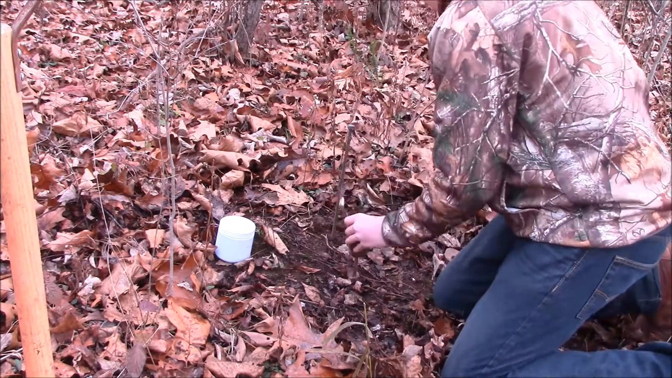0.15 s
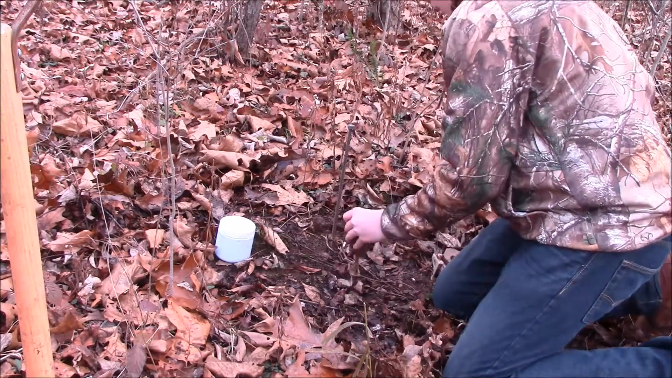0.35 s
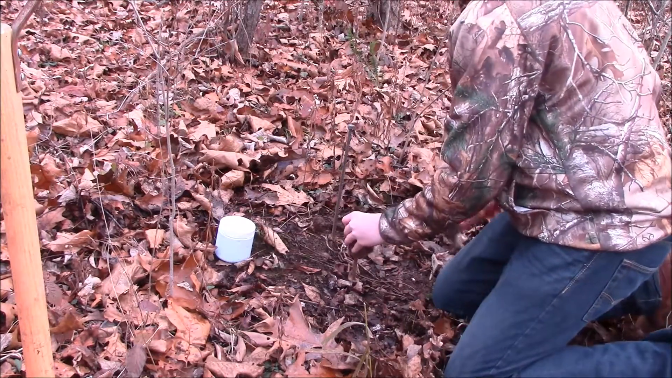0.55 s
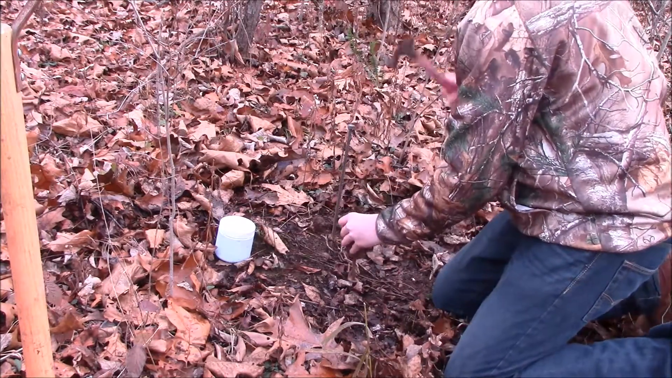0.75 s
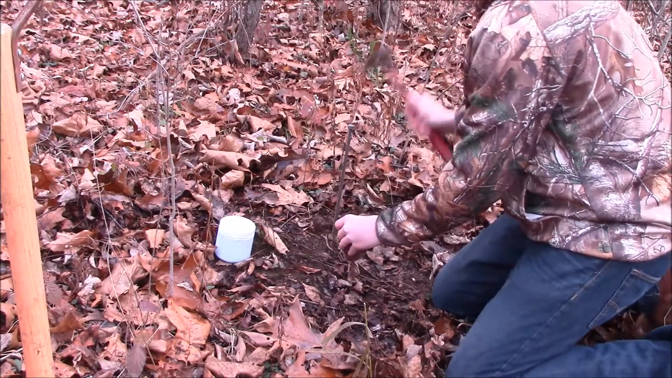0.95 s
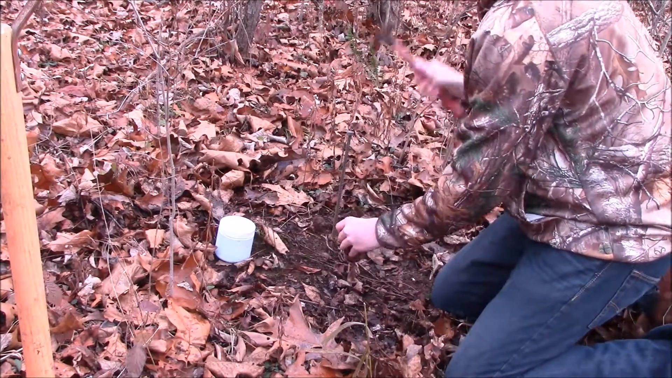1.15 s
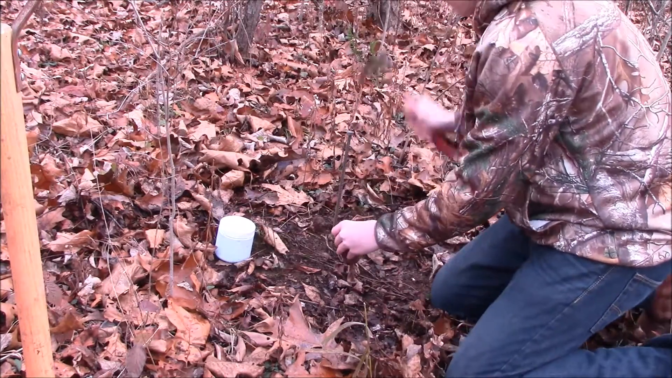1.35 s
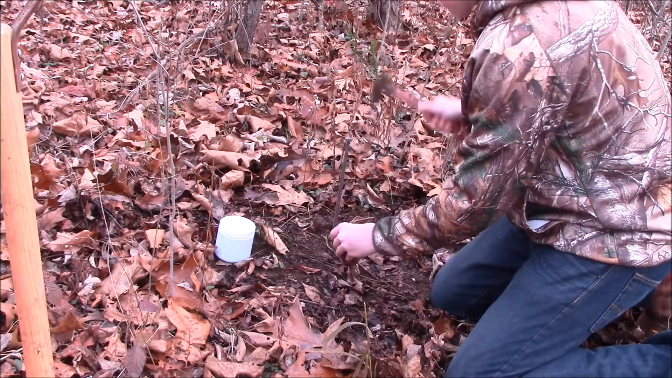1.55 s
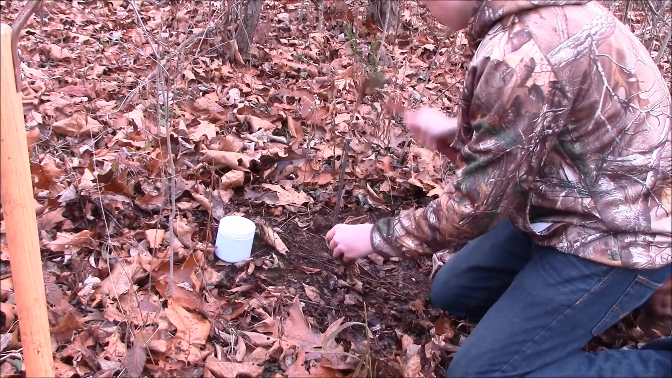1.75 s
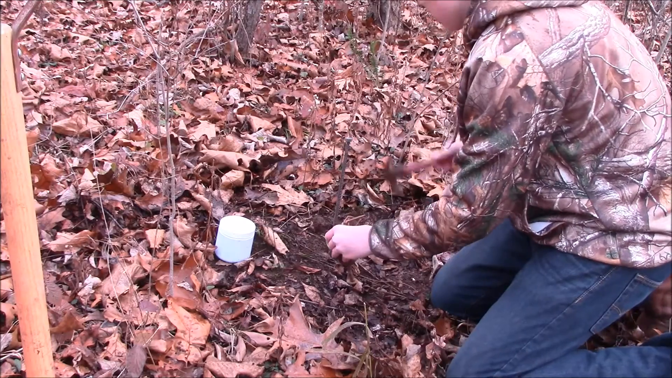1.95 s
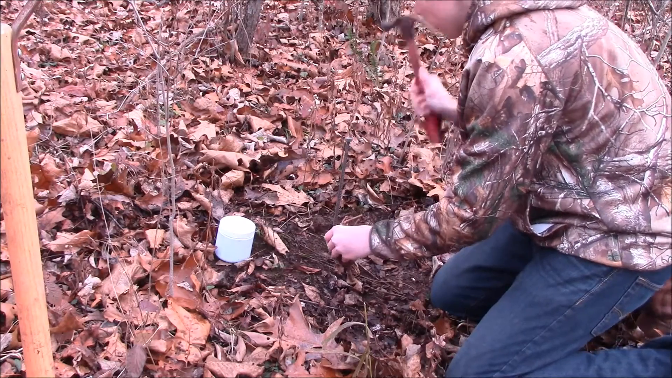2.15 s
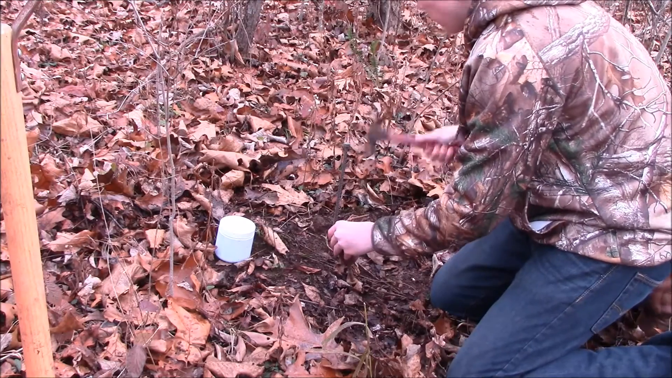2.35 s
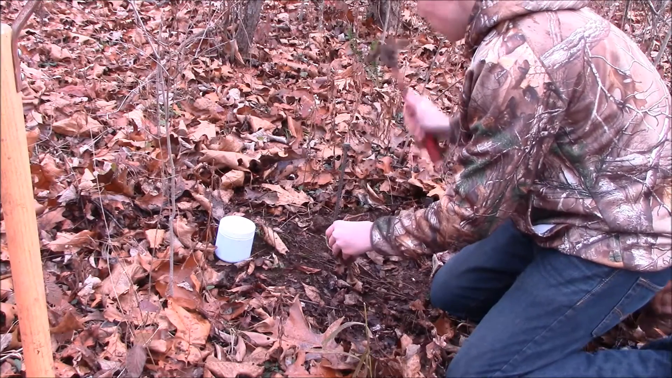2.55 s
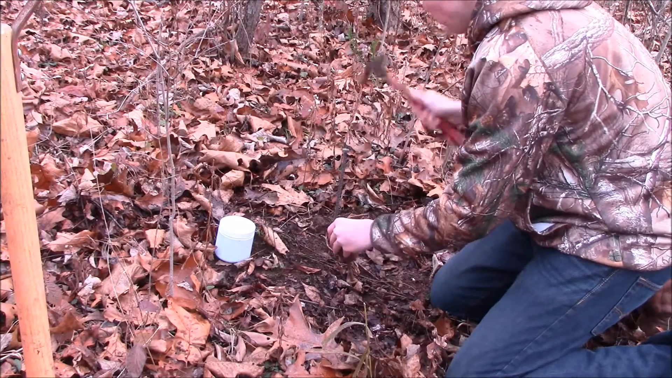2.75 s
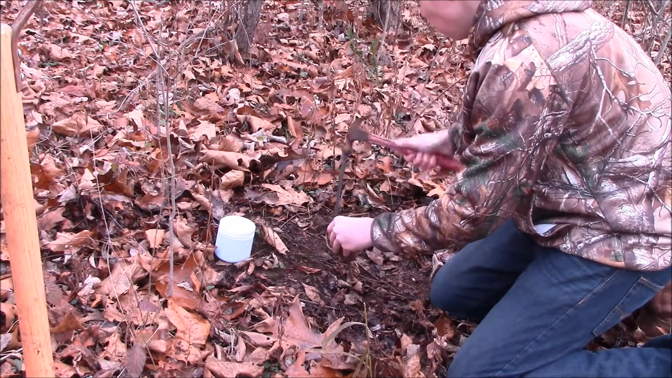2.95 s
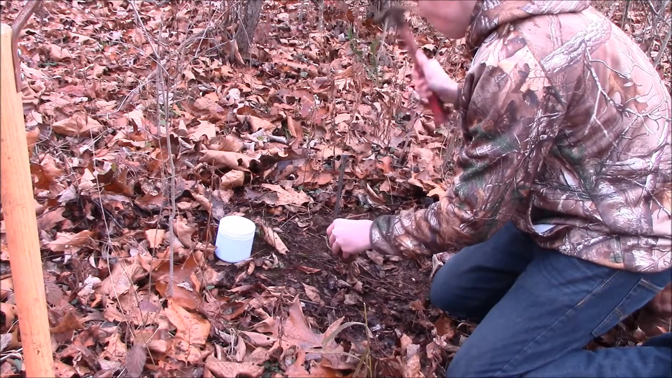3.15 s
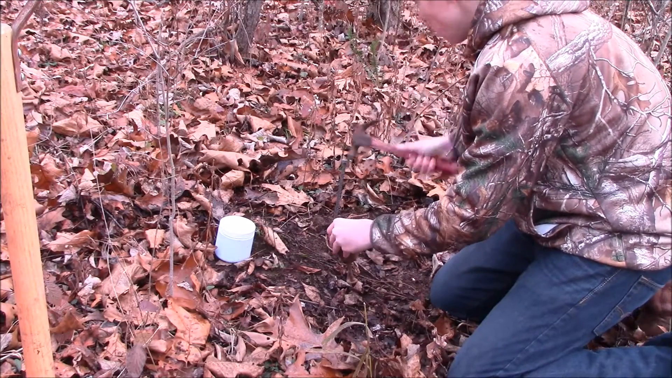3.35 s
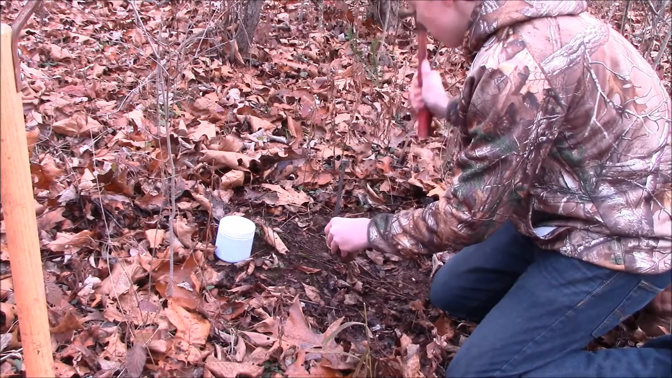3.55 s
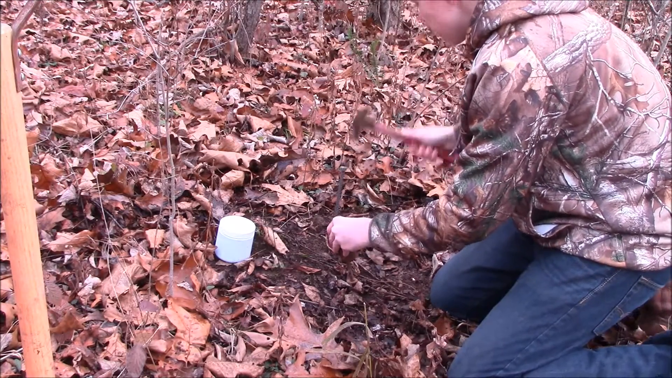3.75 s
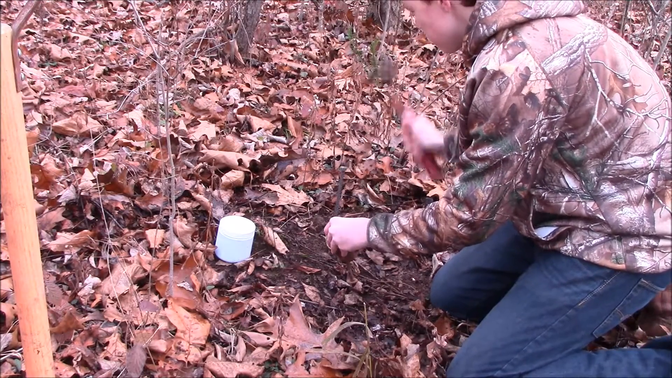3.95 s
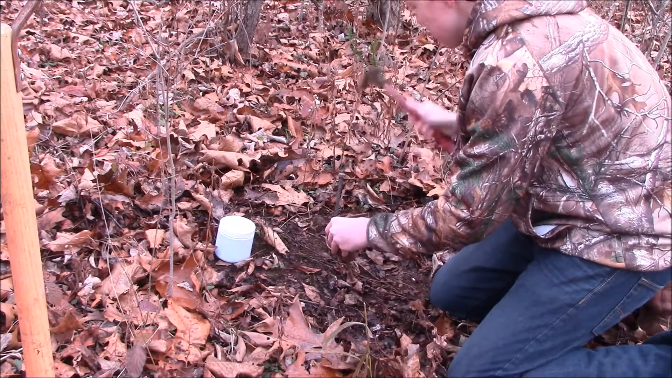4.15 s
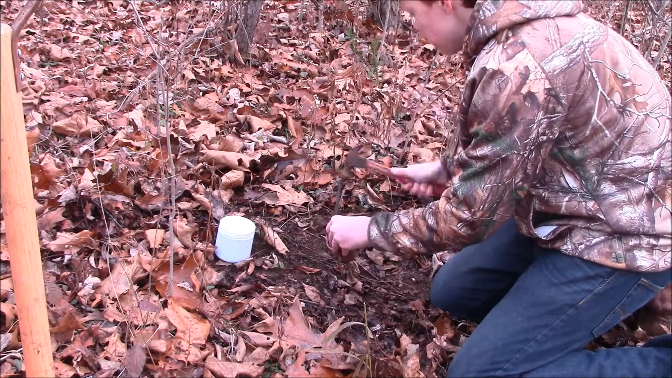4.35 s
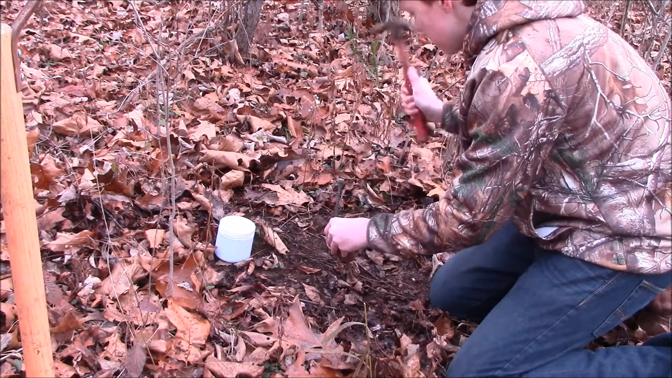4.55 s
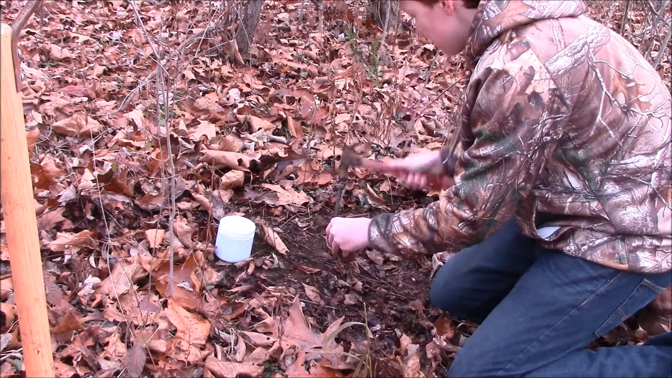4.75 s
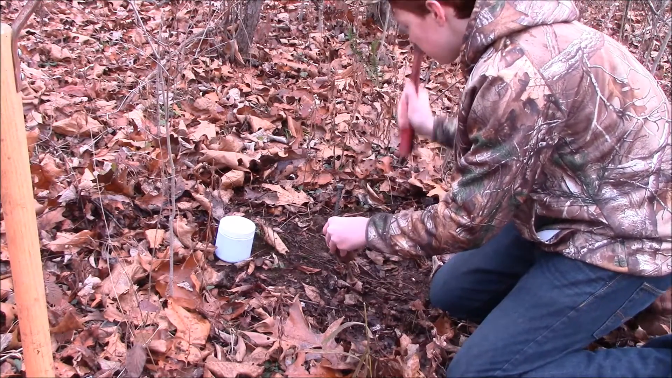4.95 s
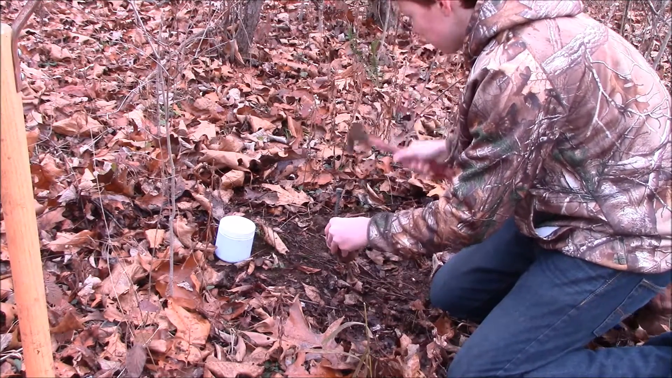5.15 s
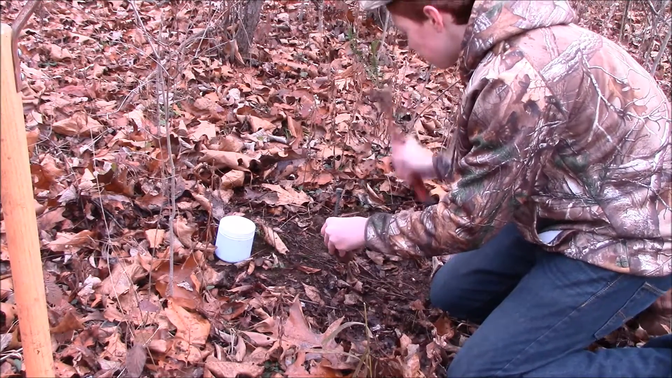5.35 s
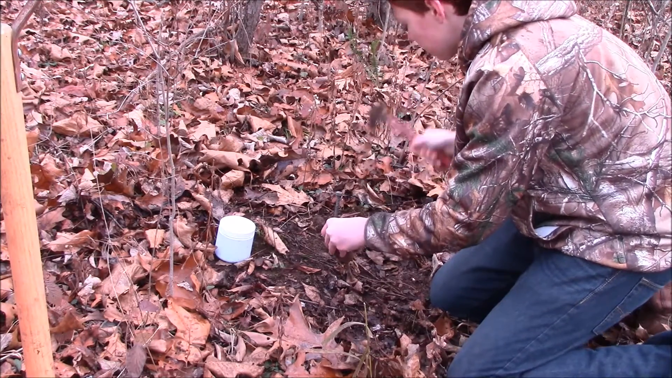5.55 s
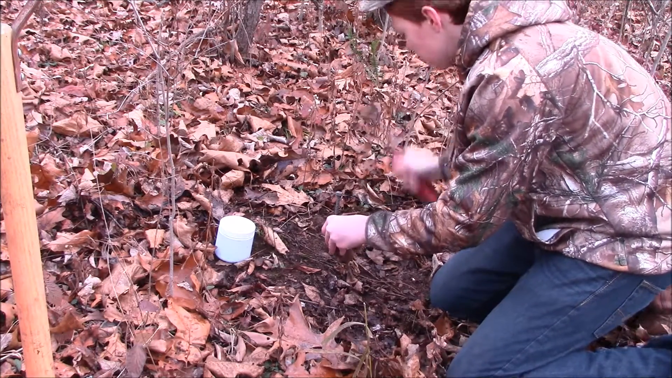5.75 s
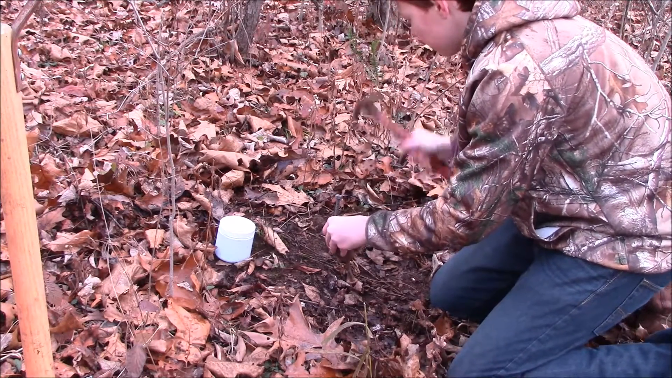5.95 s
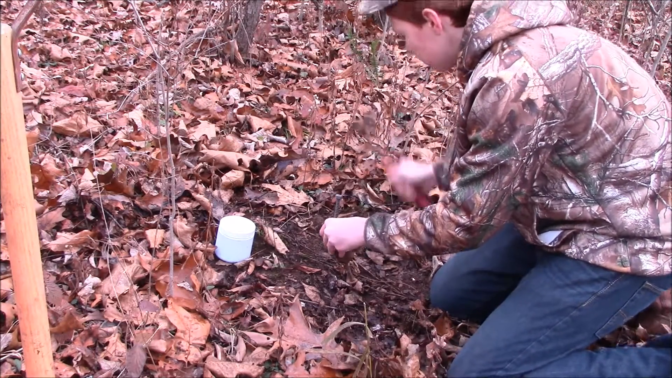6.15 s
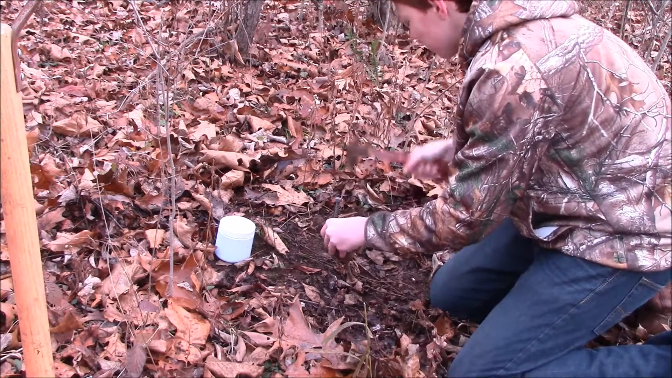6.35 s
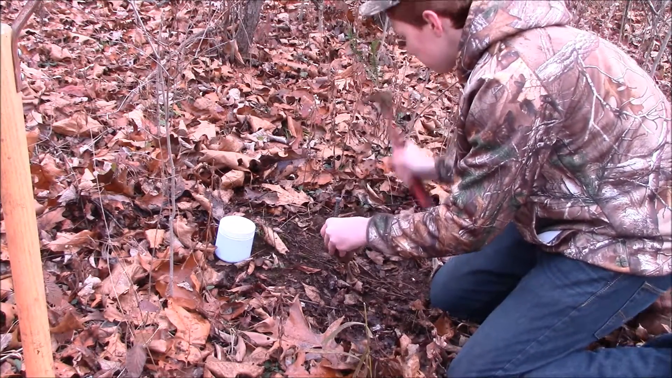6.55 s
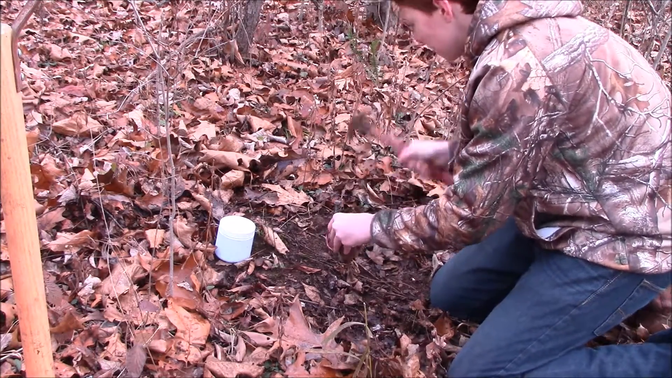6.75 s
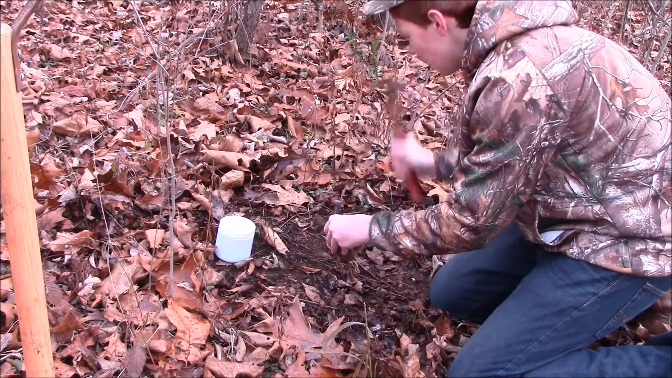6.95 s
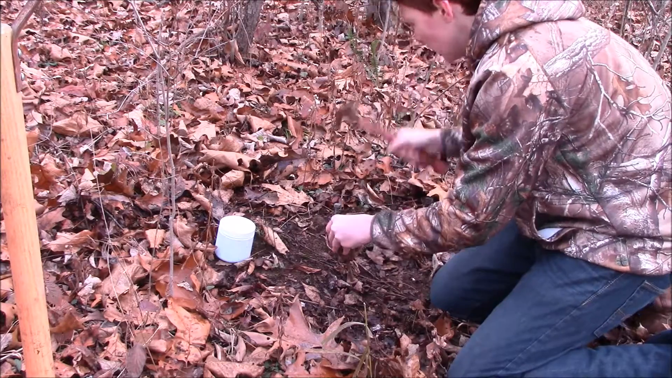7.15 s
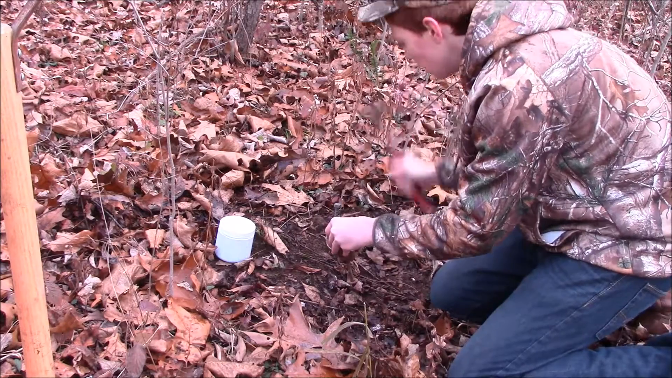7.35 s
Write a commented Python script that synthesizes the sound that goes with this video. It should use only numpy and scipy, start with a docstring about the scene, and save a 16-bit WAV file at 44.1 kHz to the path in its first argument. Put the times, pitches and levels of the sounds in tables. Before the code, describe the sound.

Quiet woodland with a faint distant rush. A metal stake is handled with a small clink, scrape and sleeve rustle, then a hammer hits it at about one second. After a pause, blows fall steadily about three per second, sharp steel clanks with a short high ring, dull thud beneath and grainy echoes from trees. Later hits are softer and drier. Close microphone, nearly mono.

```python
"""A kneeling person hammers a hand-held steel stake into damp soil in a wood: sixteen blows.
A faint, distant rush of filtered noise runs throughout. First the stake is handled: clinks (decaying metal
modes), ticks and a scrape (noise bursts); then leaves crackle and a sleeve swishes (noise too). Each blow
excites modes of stake, soil and handle: a clank, a thud, a knock and a brief singing tone, scattered back
from the trunks as dense echoes. The head drops back at times; two soft bumps in the soil come late."""
import sys
import numpy as np
from scipy import signal
from scipy.fft import rfft, irfft
from scipy.io import wavfile

SR = 44100
rng = np.random.default_rng(int(sys.argv[2]) if len(sys.argv) > 2 else 0)


def dump(signal):
    """Clip the signal to [-1, 1] and save it as 16-bit WAV at the path in sys.argv[1]."""
    limited = np.clip(np.atleast_2d(signal).T, -1, 1)
    pcm = np.round(limited * 32767).astype(np.int16)
    wavfile.write(sys.argv[1], SR, pcm)


N = 326340
AGE = np.arange(int(.4 * SR)) / SR  # time since the onset of a short sound [s]

# hammer blows: (time [s], clank strength [dB], squareness of the hit as extra treble [dB],
# level of the main singing mode [dB], t60 of the contact's chatter [s])
HAMMER_BLOWS = [(1.0402, 0.5, -0.5, -27, 0.037), (1.4343, .5, 0, -27.5, 0.019), (2.2897, 1, -5, -27, 0.034),
                (2.6569, 1, 1, -23, 0.014), (3.0077, 0.5, 3.5, -28.5, 0.021), (3.3564, 1.5, 0, -26, 0.024),
                (3.7047, -0.5, 4.5, -37.5, 0.041), (4.053, .5, 3.5, -28, .013),
                (4.4005, -0.5, 1.5, -31, 0.032), (4.7425, 3, -5, -34.5, 0.032),
                (5.0974, 1.5, -3, -39, 0.036), (5.4543, 1, -7.5, -32, 0.012), (5.8468, -3, 2.5, -36, 0.021),
                (6.2426, -1.5, -8, -41.5, 0.016), (6.661, -5, 4, -47, 0.02), (7.0656, -2, -5, -38.5, 0.034)]


def undb(db):
    """Level as amplitude ratio: 20 dB make a factor of ten."""
    return 10 ** (np.asarray(db) / 20)


def fade(t60, age=AGE):
    """Viscous damping: an exponential decay that loses 60 dB in t60 seconds."""
    return np.exp(-np.log(1000) * age / t60)


def band(x, lo_hz, hi_hz, order=2):
    """Causal Butterworth band-pass: only the range between two cut-offs is transmitted."""
    sos = signal.butter(order, [lo_hz, min(hi_hz, SR / 2 - 1)], "band", fs=SR, output="sos")
    return signal.sosfilt(sos, x)


def burst(x, db):
    """Energy level: scale a short sound so that its energy, spread over 20 ms, has this level."""
    return x * undb(db) / np.sqrt(np.sum(x ** 2) / (.02 * SR))


def noise(size=len(AGE)):
    """White noise: independent Gaussian samples with a flat mean spectrum."""
    return rng.standard_normal(size)


def add(track, s, sound):
    """Linear superposition: mix a sound into the track from time s on."""
    i = int(s * SR)
    track[i:i + len(sound)] += sound[:len(track) - i]


def ring(hz, t60):
    """Free vibration of one damped mode: an exponentially decaying sine."""
    return np.sin(2 * np.pi * hz * AGE) * fade(t60)


def rush(low_trim_db=-0.23, hiss_db=-7.5, waver_db=0.7):
    """Spectrally shaped noise: a far, low rush and a thin hiss fade together, each wavering a little."""
    # course of the rush, before the trim of each part: (time [s], level [dB])
    rush_course = [(0.0, -57), (1.77, -57.5), (2.04, -59), (3.58, -58.5), (4.55, -60), (5.21, -65),
                   (7.4, -74)]
    # spectrum, relative within each part: (frequency [Hz], level [dB])
    rush_colour = [(15, -60.5), (25, -27), (43, -14), (108, -5.5), (170, -1), (223, -11), (463, -6),
                   (1160, -14.5), (1520, -18.5), (2840, -21), (3620, -21), (4610, -26.5), (5570, -27),
                   (8590, -30.5), (16000, -46)]
    s, level_db = np.transpose(rush_course)
    colour_hz, colour_db = np.transpose(rush_colour)
    hz, t = np.arange(N // 2 + 1) * SR / N, np.arange(N) / SR
    spectrum = rfft(noise(size=N)) * undb(np.interp(np.log(hz + 1), np.log(colour_hz), colour_db))
    out = 0
    for part, trim_db in ((hz < 1500, low_trim_db), (hz >= 1500, hiss_db)):
        x = irfft(spectrum * part, N)
        waver = np.interp(t, np.linspace(0, t[-1], num=80), noise(size=80))
        out = out + x / x.std() * undb(np.interp(t, s, level_db + trim_db) + waver_db * waver)
    return out


def clinks():
    """Modal synthesis: light touches of metal on metal ring one set of modes with varying spectral tilt."""
    # touches: (time [s], level [dB], tilt about 8 kHz [dB per octave])
    touches = [(.181, -58, 24), (.1926, -36, -6), (0.226, -48, 35), (.293, -51.5, 25.5), (.323, -56, 23)]
    # modes: (frequency [Hz], relative level before the tilt [dB], t60 [s])
    touch_modes = [(3140, -26, 0.11), (4390, -13, 0.023), (5010, -25, 0.066), (6535, -15, 0.14),
                   (7970, 4.5, 0.079), (10400, -19, 0.15), (12600, -22, 0.068), (13280, -16, 0.19),
                   (15300, -16, 0.21), (15330, -18, 0.13)]
    out = np.zeros(N)
    for s, db, tilt_db in touches:
        modes = 0
        for hz, mode_db, t60 in touch_modes:
            modes = modes + undb(mode_db + tilt_db * np.log2(hz / 8000)) * ring(hz, t60)
        add(out, s, burst(modes, db))
    return out


def ticks(tick_t60=0.021, faint_count=8, faint_db=-72, spread_db=2.5, faint_hz=7000):
    """Band-limited noise bursts: ticks and a scrape as the stake is handled, then crackling leaves."""
    # the louder bursts; leaves from 0.6 s on: (time [s], level [dB], centre of the band [Hz])
    loud_ticks = [(0.187, -57.5, 4200), (0.232, -54, 11000), (.293, -51.5, 9900), (.298, -53, 9340),
                  (.304, -54, 9500), (.652, -56, 3160), (0.928, -62, 5500)]
    faint_ticks = []
    for _ in range(faint_count):  # leaves under the knees, at random times
        faint_ticks.append((rng.random() * N / SR, faint_db + spread_db * rng.standard_normal(), faint_hz))
    out = np.zeros(N)
    for s, db, hz in list(loud_ticks) + faint_ticks:
        add(out, s, burst(band(noise() * fade(tick_t60), hz / 2, hz * 1.9), db))
    return out


def sleeve(swing_lead_s=.1, swing_db=-72, swing_s=.024):
    """Friction noise: cloth swishes as the arm shifts and takes aim, and on each downswing before a blow."""
    # swishes: (time of the peak [s], gain on the band-passed noise [dB], Gaussian half-width at 1/e [s])
    swish_moves = [(0.302, -62, 0.1), (0.564, -60, 0.058), (.84, -62, 0.018), (1.866, -55.5, 0.033),
                   (2.14, -59, 0.023)]
    downswings = [(s - swing_lead_s, swing_db + db, swing_s) for s, db, *_ in HAMMER_BLOWS]
    middle = AGE[-1] / 2
    out = np.zeros(N)
    for s, db, length_s in list(swish_moves) + downswings:
        cloth = band(noise(), 4000, 11000, order=1) * np.exp(-((AGE - middle) / length_s) ** 2)
        add(out, s - middle, undb(db) * cloth)
    return out


def trunks(near_s=0.007, spread=1.288, loss_db=21, air_db=70):
    """Multiple scattering: dense small echoes that thin out with distance, the treble fastest.

    loss_db and air_db are losses per second, the latter at 11 kHz."""
    scatter_hz, scatter_octaves, scatter_db = 4840, .17, 6  # trunks throw back the singing range best
    size = 2 * len(AGE)
    age, hz = np.arange(size) / SR, np.arange(size // 2 + 1) * SR / size
    spreading = (1 - np.exp(-age / 0.0032)) * (1 + age / near_s) ** -spread
    spreading /= np.sqrt(np.sum(spreading ** 2))
    octaves = np.log2((hz + 1) / scatter_hz)
    colour = undb(scatter_db * np.exp(-(octaves / scatter_octaves) ** 2))
    echoes, response = rfft(noise(size=size)) * colour, 0
    for lo in range(0, 16001, 2000):
        part = irfft(echoes * ((hz >= lo) & (hz < lo + 2000)), size)
        # air absorbs with the square of the frequency
        response = response + part * undb(-(loss_db + air_db * (lo / 11000) ** 2) * age)
    return response * spreading


def outdoors(sound, s):
    """Convolution with the wood's response; the moving body scatters each sound, made at s, differently."""
    # start and end of the drop in echo level, which leaves the last blows with fainter echoes [s]
    echo_drop = (4.7, 5.5)
    echo_db = np.interp(s, echo_drop, [-8, -14])
    return signal.fftconvolve(sound, trunks()) * undb(echo_db)


def push(chatter_s, grit):
    """Impulsive contact force: one sharp push of either sign, then a dying random chatter."""
    force = grit * noise() * (fade(chatter_s) + 1e-18)  # a tiny floor keeps the chatter above zero
    force[0] += 1 if rng.random() < .5 else -1
    return force


def crack(db, t60, grit, lo_hz, hi_hz):
    """Broadband impact radiation: the contact force itself, band-limited."""
    return burst(band(push(t60, grit), lo_hz, hi_hz), db)


def struck(modes, edges_hz, group_db, chatter_s, grit, scatter_db=1.13, shift=0.12):
    """Forced resonance: contact forces drive two-pole modes, levelled in groups of neighbours.

    Each blow scatters the level of a mode, and its frequency by a share of its bandwidth (shift)."""
    groups = np.zeros((len(group_db), len(AGE)))
    for nominal_hz, db, t60 in modes:
        # the grip changes from blow to blow, and the most damped modes shift most
        bandwidth_hz = np.log(1000) / (np.pi * t60)
        hz = nominal_hz + shift * rng.standard_normal() * bandwidth_hz
        radius = fade(t60, 1 / SR)
        poles = [1, -2 * radius * np.cos(2 * np.pi * hz / SR), radius ** 2]
        # so small a body radiates little far from its resonance
        skirt = np.exp(-2 * np.pi * nominal_hz / SR)
        mode = signal.lfilter([1, 0, -1], np.convolve(poles, [1, -skirt]), push(chatter_s, grit))
        group = np.searchsorted(edges_hz, nominal_hz)
        groups[group] += burst(mode, db + scatter_db * rng.standard_normal())
    return sum(burst(g, db) for g, db in zip(groups, group_db))


def clank(group_db, chatter_s, grit=0.12, crack_db=-4.0, crack_t60=0.027):
    """Modal impact of steel on steel: a broad crack and the short ring of the stake."""
    # modes of the stake, damped by hand and soil:
    # (nominal frequency [Hz], mean level relative within its group [dB], t60 [s])
    stake_modes = [(2560, -5, 0.0028), (2830, -5, 0.018), (2890, -10, 0.018), (3080, -5.5, 0.0058),
                   (3592, -3.5, 0.0091), (3970, -1.5, 0.018), (4700, -1.5, 0.016), (4772, 0.5, 0.017),
                   (5240, -8, 0.018), (7020, -5, .007), (6925, 0, 0.026), (7486, 0, 0.012),
                   (8410, -2.5, 0.0045), (9755, -2, 0.0094), (10000, -3, .007), (10514, 2, 0.01),
                   (12100, 1.5, 0.0091), (13250, -3.5, 0.0084), (14800, -4.5, 0.0082)]
    # borders between the six groups of modes: (frequency [Hz])
    stake_edges = [4100, 5500, 7180, 9000, 11200]
    impact = crack(np.mean(group_db) + crack_db, crack_t60, grit, 2100, 17000)
    return impact + struck(stake_modes, stake_edges, group_db, chatter_s, grit)


def ground(knock_db, thud_db, soil_db, slip_s=0.03):
    """Heavily damped resonance: the handle knocks, the stake slips and thuds, the soil gives way."""
    # dull modes of the soil, the sinking stake and the hammer handle:
    # (nominal frequency [Hz], mean level relative within its group [dB], t60 [s])
    dull_modes = [(161, 0, 0.025), (228, -2.5, 0.068), (297, 1.5, 0.03), (371.1, 1, 0.031),
                  (420.3, -0.5, 0.066), (784, -1, 0.015), (1186, -0.5, 0.011), (1490, -0.5, 0.01),
                  (1700, -8, 0.0056)]
    # borders between soil, thud and knock: (frequency [Hz])
    dull_edges = [190, 600]
    return struck(dull_modes, dull_edges, [soil_db, thud_db, knock_db], slip_s, grit=0.12)


def singing(ring_db, overtone_db, grip_s, swell_s=0.0007, t60=0.66, overtone_grip_s=0.047, closing=3.1):
    """Bending modes with growing damping: they sing until hand and soil close on the stake again."""
    # weaker modes beside the main one: (mean frequency [Hz], level re overtone_db [dB], t60 before the grip [s])
    side_modes = [(4495, -11, 0.19), (4780, -10.5, 0.037), (4846, -11.5, .15), (5250, -15, 0.12)]
    swell = 1 - np.exp(-AGE / swell_s)
    main_hz = 3972 * (1 + 0.0017 * rng.standard_normal())
    main = ring(main_hz, t60) * swell / (1 + (AGE / grip_s) ** closing)
    held = swell / (1 + (AGE / overtone_grip_s) ** 4)
    out = burst(main, ring_db)
    for mean_hz, db, overtone_t60 in side_modes:
        hz = mean_hz * (1 + .003 * rng.standard_normal())
        out = out + burst(ring(hz, overtone_t60) * held, overtone_db + db)
    return out


def blows(clank_db=-0.82, singing_echo_db=-4, splash_db=-1.0, splash_t60=.012):
    """Impact excitation under changing load: each blow, with echoes, drives the stake one step deeper."""
    # the stake's six groups of modes, low to top, before clank_db: (level at the first blow [dB],
    # gain as the stake goes fully in [dB], share of the extra treble [dB per dB])
    stake_groups = [(-24, -3, -0.098), (-31, 0.5, 0.042), (-30.5, 4, 0.52), (-24.5, -2.5, -.2),
                    (-26, -.5, 1), (-29, -11, 0.72)]
    loose_db, loose_depth = -13, .11  # loss in loose topsoil at the first blow; its share of the full depth
    packed_db = -3.5  # packed soil yields less: change at the full depth
    shallow_grip_s, deep_grip_s = .03, .016  # time until hand and soil stop the ring
    off_centre_gain = .35  # dB that overtones gain for each dB of treble lost in an off-centre hit
    base_db, sunk_db, treble_share = np.transpose(stake_groups)
    depths = np.linspace(0, 1, num=len(HAMMER_BLOWS))  # share of the full depth
    out = np.zeros(N)
    for (s, db, square_db, ring_db, chatter_s), depth in zip(HAMMER_BLOWS, depths):
        group_db = base_db + db + depth * sunk_db + square_db * treble_share
        seat_db = loose_db * np.exp(-depth / loose_depth) + packed_db * depth
        dull = ground(knock_db=-35.5 + seat_db, thud_db=-34 + seat_db, soil_db=-44 + seat_db)
        impact = clank(group_db + clank_db, chatter_s) + dull
        grip_s = shallow_grip_s + depth * (deep_grip_s - shallow_grip_s)
        tone = singing(ring_db, group_db[1] - off_centre_gain * square_db, grip_s)
        # the crack of the head radiates widely and fills the wood more than the low-lying shaft does
        splash = crack(np.mean(group_db) + splash_db, splash_t60, 0.11, 2400, 14000)
        add(out, s, impact + tone)
        add(out, s, outdoors(0.77 * impact + splash + undb(singing_echo_db) * tone, s))
    return out


def tocks(tock_t60=.03, swell_s=0.0022):
    """Single-mode resonance: hollow tocks of the wooden handle, with a soft onset."""
    # tocks: (time [s], level [dB], frequency [Hz])
    handle_tocks = [(1.042, -39, 1066), (5.1256, -48.5, 1230), (5.1419, -60, 1190)]
    out = np.zeros(N)
    for s, db, hz in handle_tocks:
        add(out, s, burst(ring(hz, tock_t60) * (1 - np.exp(-AGE / swell_s)), db))
    return out


def rebounds_and_bumps():
    """Secondary impact: the hammer head drops back on the stake; the last two are soft, dull bumps in the soil."""
    # impacts: (time [s], clank level before the group offsets [dB], knock level [dB])
    small_impacts = [(1.0454, -30.5, -47.5), (2.2955, -30, -48.5), (2.311, -34, -45.5), (3.365, -33, -49),
                     (3.714, -30, -38.5), (4.0590, -30.5, -46.5), (4.4359, -41.5, -49), (6.699, -58, -57.5),
                     (7.1124, -72, -62)]
    group_offsets_db = np.array([-4, -3.5, -4.5, -6.5, -12.0, -13.0])
    out = np.zeros(N)
    for s, db, knock_db in small_impacts:
        dull = ground(knock_db, knock_db - 3.0, knock_db - 13.0)
        impact = clank(db + group_offsets_db, chatter_s=0.014) + dull
        add(out, s, impact)
        add(out, s, outdoors(impact, s))
    return out


def scene(side_db=-25, handling_echo_db=-4, side_noise_db=-19):
    """Mid-side stereo: all sits straight ahead with a trace of difference between the ears.

    A faint independent noise of the same colour as the rush is added to the side."""
    handling = clinks() + ticks() + sleeve() + tocks()
    near = blows() + rebounds_and_bumps() + handling + undb(handling_echo_db) * outdoors(handling, 0)[:N]
    less_middle = near - .5 * band(near, 900, 3500, order=1)
    scattered = signal.fftconvolve(less_middle, trunks())[:N]
    side_noise = undb(side_noise_db) * rush()
    side = undb(side_db) * scattered + side_noise
    mid = near + rush()
    return np.array([mid + side, mid - side])


def record(dry, low_cut_hz=62, top_hz=15900):
    """Saturation and band limiting: loud peaks are rounded, the deepest bass thinned, the top cut."""
    ceiling = .68  # amplitude
    rounded = ceiling * np.tanh(dry / ceiling)
    thinned = signal.sosfilt(signal.butter(2, low_cut_hz, "high", fs=SR, output="sos"), rounded)
    return signal.sosfilt(signal.ellip(8, .2, 70, top_hz, fs=SR, output="sos"), thinned)


dry = scene()
out = record(dry)
dump(out)
```